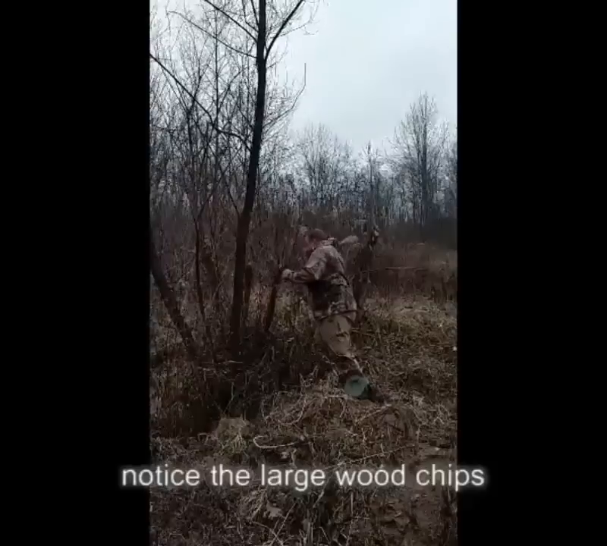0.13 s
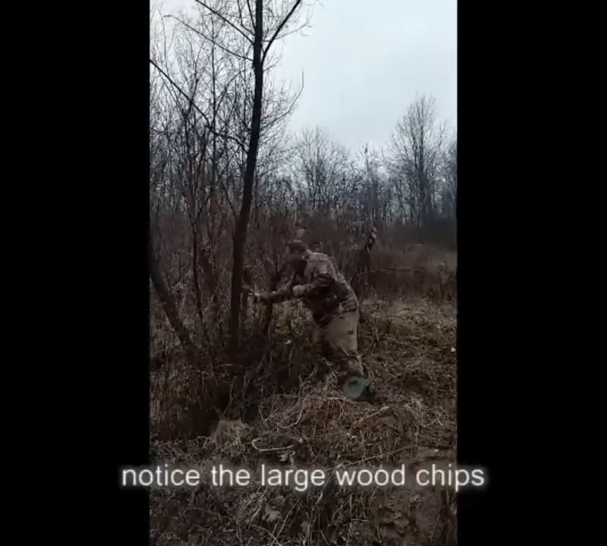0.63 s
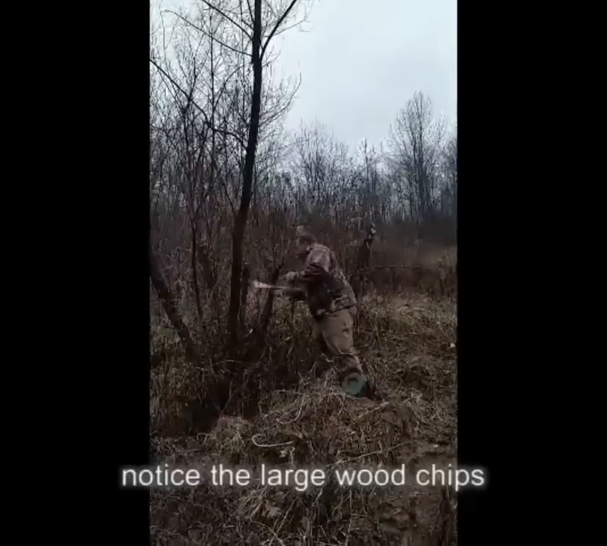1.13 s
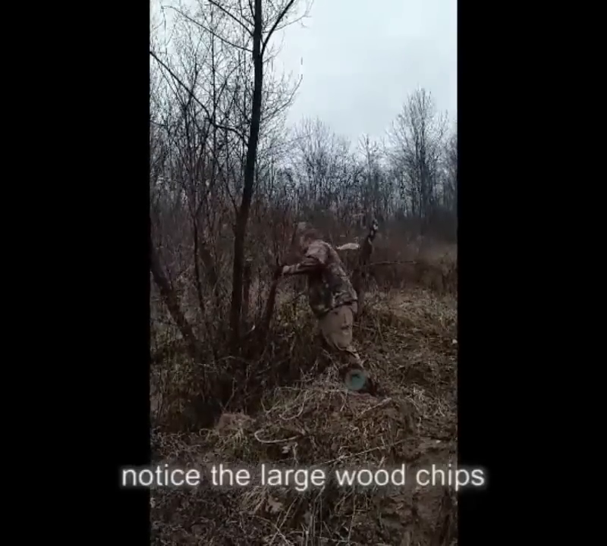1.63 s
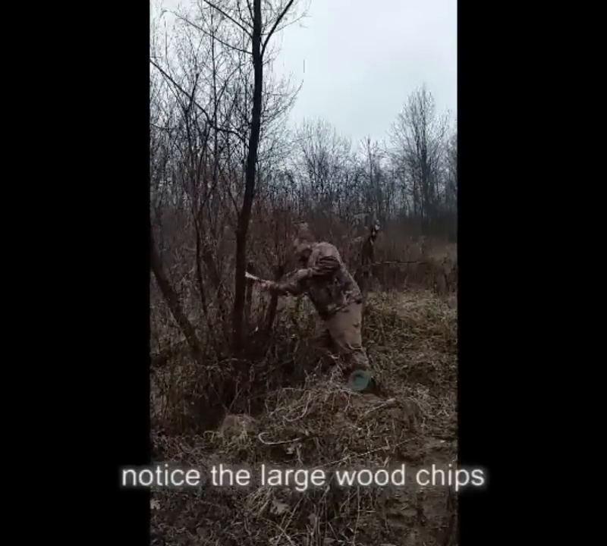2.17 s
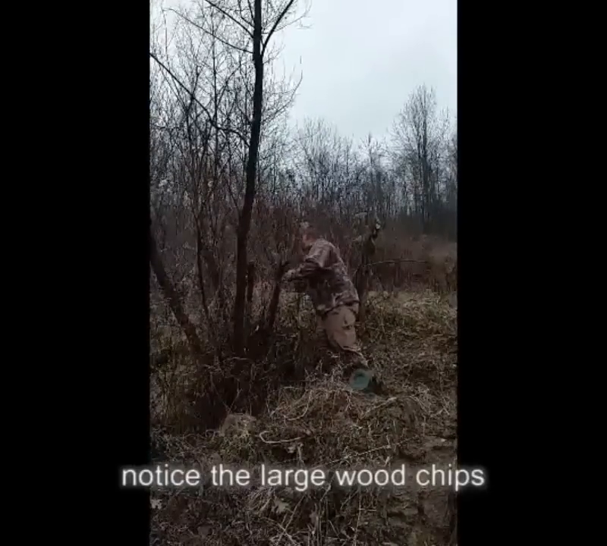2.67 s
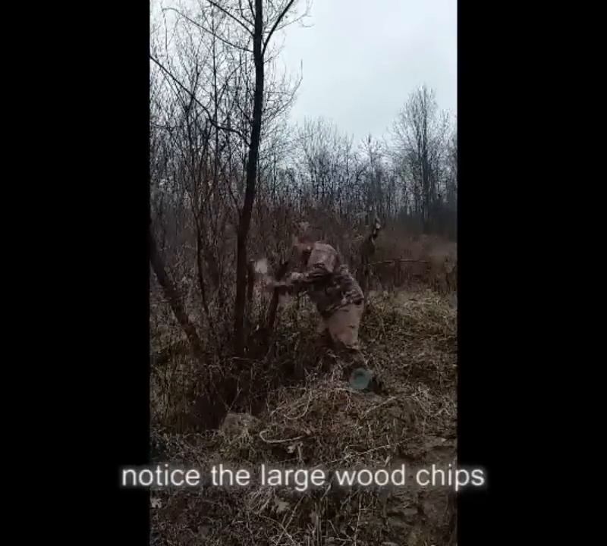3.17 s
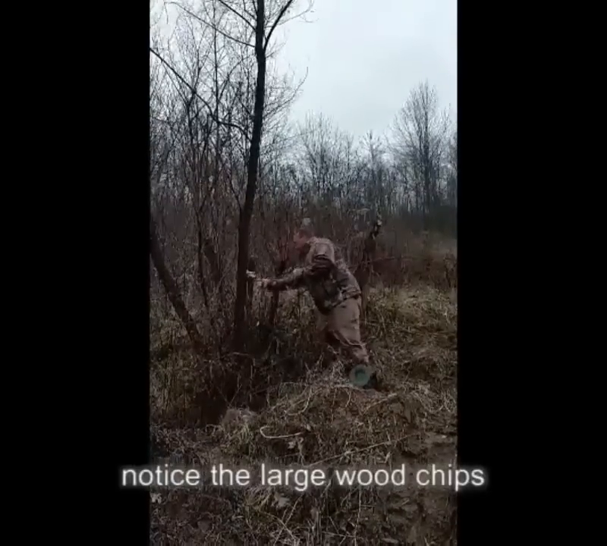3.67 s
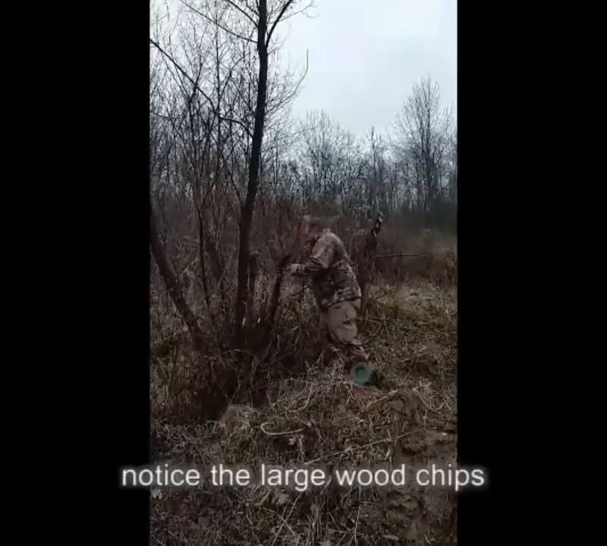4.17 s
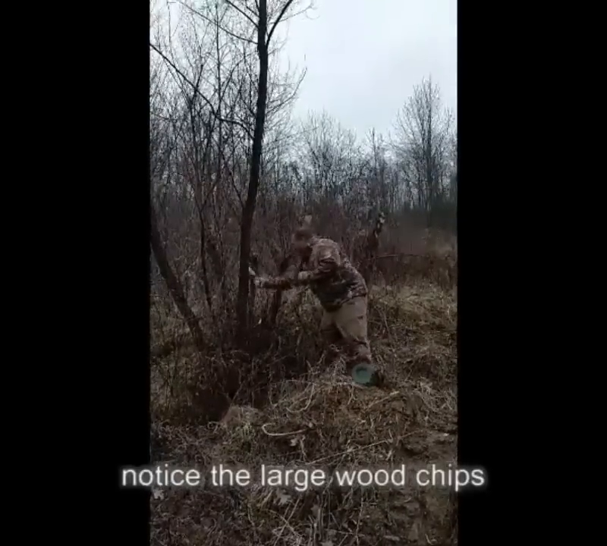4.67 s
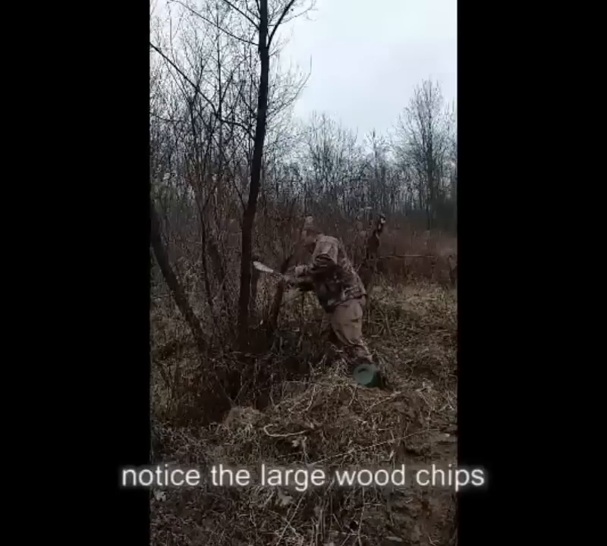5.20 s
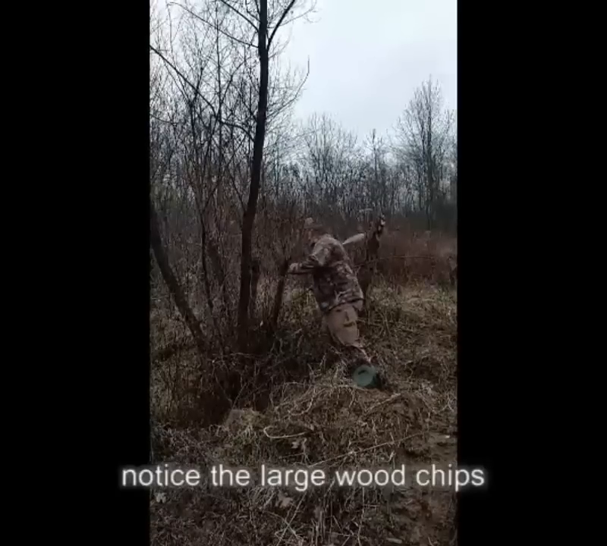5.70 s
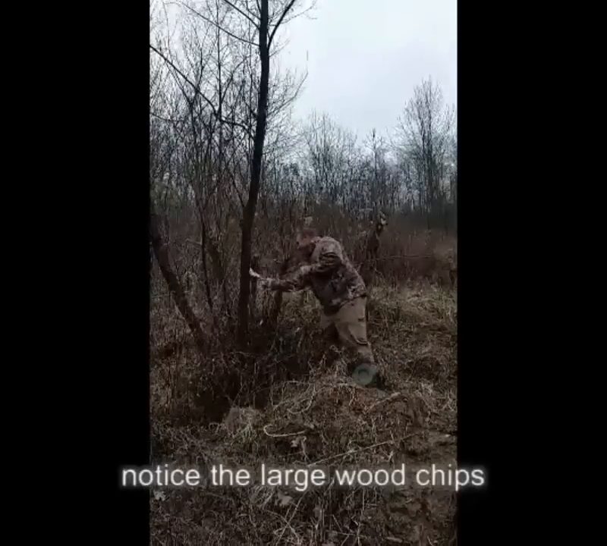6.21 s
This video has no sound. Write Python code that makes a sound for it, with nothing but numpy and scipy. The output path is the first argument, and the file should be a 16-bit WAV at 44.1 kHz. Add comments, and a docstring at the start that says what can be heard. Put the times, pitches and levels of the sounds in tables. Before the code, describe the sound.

Outdoors in scrubby woodland, a heavy blade hits a thin standing trunk five times, evenly spaced about 1.4 seconds apart. The first blow is thinner and brighter; the rest are hard, woody cracks with a tiny metallic chink and short scattered echo from the trees. Soft low wind puffs bump the microphone between blows, with small twig ticks. Single channel, microphone some metres away.

```python
"""Chopping in the woods

A heavy blade chops a thin trunk five times, some metres from the microphone in scrubby woodland.
Each blow is a shaped noise bite, a dull stop pulse and weakening after-knocks that excite damped trunk
modes; short blade tones chink within the bite, and decaying scattered noise is the answer of the trees.
Low pulses and filtered grains are wind puffs over a distant noise wash, a mid hush and a bright rustle.
Noise ticks of twigs and chips come now and then, and faint far hoots sag in pitch."""
import sys
import numpy as np
from scipy import signal
from scipy.fft import rfft, irfft
from scipy.io import wavfile
from scipy.ndimage import uniform_filter1d

SR = 44100
rng = np.random.default_rng(int(sys.argv[2]) if len(sys.argv) > 2 else 0)


def waveform_to_disk(signal):
    """Save audio, clipped to [-1, 1], as 16-bit WAV at the path in sys.argv[1]."""
    frames = np.transpose(np.atleast_2d(signal))
    scaled = np.clip(frames, -1, 1) * 32767
    samples = np.round(scaled).astype(np.int16)
    wavfile.write(sys.argv[1], SR, samples)


def elevation(decibels):
    """Turn decibel levels (scalar or array-like) into linear amplitude ratios."""
    levels = np.asarray(decibels, float)
    return 10 ** (levels / 20)


N = 279153
TIME = np.arange(N) / SR

# Spectrum of the distant wash. Each row: frequency in Hz, relative density in dB.
WASH_SPECTRUM = [(76, -30), (130, -8), (166, -2), (285, -8.5), (435, -12), (692, -15.5), (1240, -18),
                 (1550, -25.5), (2180, -22), (5500, -34), (6870, -35.5), (14800, -48), (16000, -53.5)]
# Level of the wash. Each row: time in seconds, level in dB.
WASH_LEVEL = [(0, -56), (.9, -60), (2.6, -58), (3.3, -58.5), (5.3, -60.5), (6.33, -60)]
# Spectrum of the mid hush. Each row: frequency in Hz, relative density in dB.
HUSH_SPECTRUM = [(300, -15), (900, 2), (1400, 8.5), (2200, -0.5), (5000, -32)]
# Level of the hush as it swells and fades. Each row: time in seconds, level in dB.
HUSH_LEVEL = [(0, -64.5), (.35, -61), (1.2, -68), (1.7, -78.5), (2.3, -77.5), (4, -72), (6.33, -70.5)]

# Spectrum of the rustling brush. Each row: frequency in Hz, relative density in dB.
BRUSH_SPECTRUM = [(800, -18.5), (2500, 4), (5000, -4), (7000, -1.5), (10000, -9.5), (15000, -18)]
# Swishes of the brush. Each row: centre in seconds, level in dB, spread in seconds.
SWISHES = [(.08, -76, 0.052), (1.41, -69, 0.014), (3.2, -68.5, 0.048), (4.51, -65, 0.033)]
RUSTLE_DB = -69  # the steady part

# Spectrum of the small eddies. Each row: frequency in Hz, relative gain in dB.
WIND_SPECTRUM = [(12, -32), (25, -1.5), (40, 3.5), (70, -0.5), (123, -3), (191, -12), (230, -20.5),
                 (400, -38.5), (520, -55), (880, -120)]
# Level of the small eddies. Each row: time in seconds, level in dB.
GUST_LEVEL = [(0, -64), (.4, -55), (.8, -65.5), (1.0, -59.5), (1.2, -44.5), (1.45, -57), (1.7, -50),
              (1.9, -47.5), (2.15, -36.5), (2.6, -45), (2.92, -44.5), (3.05, -54.5), (3.4, -36),
              (3.7, -52.5), (3.85, -31), (4.05, -47), (4.2, -46.5), (4.33, -51.5), (4.5, -52),
              (4.64, -29.5), (4.9, -50), (5.14, -43.5), (5.7, -49), (5.97, -43), (6.12, -53.5),
              (6.33, -40.5)]
# Strongest wind puffs. Each row: centre in seconds, level in dB, frequency in Hz.
PUFFS = [(1.178, -32, 72), (1.532, -34.5, 68), (1.987, -18.5, 104), (2.029, -30.5, 152), (2.167, -33, 110),
         (2.216, -18.5, 72.5), (2.232, -21, 140), (2.306, -42, 114), (2.448, -17.5, 125),
         (2.488, -31.5, 95), (2.59, -25.5, 95), (2.612, -29, 127), (2.892, -23, 69.5), (2.922, -29, 60),
         (2.946, -27, 99), (3.236, -27, 80), (3.398, -25, 89), (3.758, -36, 170), (3.811, -22.5, 92.4),
         (3.829, -21.5, 159), (3.853, -24.5, 155), (3.882, -16.5, 123), (4.054, -25.5, 88),
         (4.215, -37, 110), (4.404, -31, 92), (4.581, -21, 121), (4.634, -24.5, 124), (4.663, -20.5, 156),
         (4.791, -29.5, 216), (5.054, -32.5, 61), (5.11, -32, 54.4), (5.161, -33, 70), (5.472, -31, 116),
         (5.552, -16, 85.7), (5.562, -33.5, 200), (5.942, -33, 93), (5.984, -30.5, 108), (6.067, -34, 63)]
PUFF_CYCLES = 1.106

# Twigs and chips. Each row: start in seconds, level in dB, reference frequency in Hz,
# treble tilt above it in dB per octave, fall time by 60 dB in seconds.
TICKS = [(0.2188, -37, 1510, -1, 0.027), (0.266, -43, 1650, -5.5, 0.035), (.632, -38.5, 2820, 13, 0.011),
         (0.715, -51, 2520, 11, 0.026), (0.7418, -44, 1960, -2.5, 0.089), (0.958, -46.5, 3500, 0, 0.013),
         (1.303, -41, 4500, 0.5, 0.013), (2.046, -45, 3300, 0, 0.039), (2.356, -44, 5000, 0, 0.011),
         (2.499, -45, 480, -3, 0.065), (3.223, -40.5, 550, -4, 0.054), (3.384, -39, 3400, 7, .015),
         (4.678, -47.5, 1200, -2.5, 0.032), (5.6213, -45.5, 2600, -2, 0.014),
         (5.7335, -47.5, 1760, 1.5, 0.019)]

# Blows. Each row: start in seconds, bite length in ms, crackle in dB, tearing in dB,
# tilt in dB per octave.
BLOWS = [(0.6615, 1.43, -17.5, -21, 5), (2.0758, 2.58, -15, -17.5, -2), (3.4167, 4.1, -13.5, -13.5, -1),
         (4.8031, 3.4, -23.5, -19, 4), (6.191, 4.05, -17, -16.5, 0.5)]
# Pushes into the wood, a row a blow. Each row: entry in dB, stop delay in ms, stop in dB,
# stop pitch in Hz, rebound gap in ms, first rebound in dB.
PUSHES = [(-36, 0.94, -14.5, 1530, 5.3, -18), (-15, 2.82, -2.5, 1205, 9.6, -17),
          (-8, 2.3, -5.5, 850, 6, -18), (-14.5, 3.35, -4, 1260, 11, -21.5),
          (-9, 3.78, -2.5, 1060, 4, -15.5)]
ENTRY_AT, ENTRY_HZ = 0.25, 1470  # share of the bite length; pitch
REBOUND_HZ, REBOUND_FALL_DB = 910, -2.5  # pitch before scatter; change from one rebound to the next
THUD_DB, THUD_HZ = -21.5, 355  # a low thud goes with the stop, relative to its level
THUMP_DB, THUMP_HZ, THUMP_LAG_S = -51, 100.6, 0.01  # the root plate answers every blow
# Modes of the trunk. Each row: frequency in Hz, filter gain in dB, fall time by 60 dB in seconds.
TRUNK_MODES = [(211.7, -31.5, .08), (370.5, -30.5, 0.038), (582, -44.5, 0.054), (707, -35.5, 0.043),
               (824, -41.5, .045), (955, -42, 0.026), (1126, -52, 0.013), (1200, -47.5, 0.023),
               (1310, -38, 0.028), (1633, -43.5, 0.015), (1770, -42.5, 0.026)]
# Spectrum of the bite. Each row: frequency in Hz, relative density in dB.
BITE_SPECTRUM = [(1000, -16.5), (1800, -0.5), (2300, -7.5), (3200, 5.5), (4500, -1.5), (5800, -15.5),
                 (7000, -9.5), (10700, -28), (13900, -25), (15500, -48.5)]
SWELL_DB, SWELL_DB_PER_MS = -18.5, 6  # faint noise before the bite: level relative to it, and rise
# Spectrum of the tearing fibres. Each row: frequency in Hz, relative density in dB.
SPLINTER_SPECTRUM = [(180, -25), (300, -8), (1300, -10), (1840, -19), (2170, -13), (3070, -16),
                     (4720, -28.5), (7500, -21.5), (13800, -54), (15500, -74)]
# Decay of the tearing fibres. Each row: frequency in Hz, fall time by 60 dB in seconds.
SPLINTER_T60 = [(500, 0.1), (1500, 0.051), (4000, 0.047), (10000, 0.017)]
# Damped modes of the blade in the cut. Each row: frequency in Hz, relative level in dB, cycles.
BLADE_MODES = [(1630, 11.5, 1.2), (3300, -5, 5.4), (4353, -1.5, 4.5), (6660, 0.5, 8), (8400, -5, 5.5)]
# Chink of the edge, a row a blow. Each row: level in dB, pitch factor, brightest frequency in Hz,
# fall away from it in dB per squared octave.
CHINKS = [(-10.5, 1.11, 7900, 39.5), (-11.5, 0.956, 2750, 6.5), (-8, 1.02, 2030, 6), (-2, 1.047, 3040, 16),
          (-10.5, 1.028, 3600, 5.5)]
CHINK_AT, CHINK_SCATTER = 0.55, 0.3  # mean place and full range, as shares of the bite length

# Spectrum of the trees' answer. Each row: frequency in Hz, relative density in dB.
TREES_SPECTRUM = [(180, -31), (300, 2.5), (509, -14), (849, -6), (1050, -7), (1540, -7), (2210, -10.5),
                  (3870, -16), (6790, -18.5), (13600, -40), (15500, -51)]
# Answer of the trees, a row a blow. Each row: level in dB, tilt in dB per octave,
# centre of a lifted band in Hz, lift in dB.
ANSWERS = [(-48, 1.5, 7300, 8), (-40.5, 1, 1570, 4), (-40.5, 1, 2900, 3.5), (-41.5, 1.5, 3490, 5.5),
           (-40, 1, 1600, 2)]
# Echo bunches from near trunks. Each row: delay in seconds, relative level in dB, spread in seconds.
ECHOES = [(0.046, -3, 0.0072), (.072, -8.5, 0.01)]
TREBLE_HZ, TREBLE_LOSS_DB_PER_S = 5000, 44.5  # air and twigs swallow the treble of late echoes
WOODY_HZ, WOODY_DB = 1500, 3  # a band that the trunks throw back after every blow

# Faint far hoots. Each row: start in seconds, length in seconds, level in dB, initial pitch in Hz.
HOOTS = [(2.6, 0.26, -66, 540), (2.91, 0.27, -64, 495), (5.08, 0.11, -67.5, 529), (5.42, 0.19, -65.5, 508)]
HOOT_SAG_HZ_PER_S, HOOT_EDGE_S = 127, 0.027


def evened(x):
    """Normalisation divides by the root mean square, giving rms 1."""
    return x / np.sqrt(np.mean(x ** 2) + 1e-20)


def read(points, hz):
    """A spectrum is interpolated linearly along a logarithmic frequency axis."""
    f, value = np.transpose(points)
    return np.interp(np.log(hz + 1), np.log(f + 1), value)


def level_curve(rows):
    """A level linear in dB between points gives an exponential amplitude envelope."""
    seconds, db = np.transpose(rows)
    return elevation(np.interp(TIME, seconds, db))


def add(mix, s, sound):
    """Superposition: a sound starting at s seconds adds to the mix."""
    part = mix[round(s * SR):][:len(sound)]
    part += sound[:len(part)]


def add_wavelet(mix, s, db, hz, cycles, phase):
    """A cosine under a Gaussian envelope centred on s forms a pulse of a few cycles."""
    t = np.arange(-N // 100, N // 100) / SR
    bell = np.exp(-0.5 * (2.69 * hz * t / cycles) ** 2)
    add(mix, s + t[0], elevation(db) * bell * np.cos(2 * np.pi * hz * t + phase))


def coloured(x, points):
    """Zero-phase filtering multiplies the spectrum by a real gain."""
    hz = np.fft.rfftfreq(len(x), 1 / SR)
    return irfft(rfft(x) * elevation(read(points, hz)), len(x))


def noise(points, patchy_db, size=1024):
    """Random short-time spectra make coloured noise; smoothed level noise makes its patches drift."""
    hz = np.fft.rfftfreq(size, 1 / SR)
    real, imaginary, patches = rng.standard_normal((4 * N // size + 5, len(hz), 3)).T
    patches = uniform_filter1d(patches, size=10, axis=0)  # along frequency
    patches = evened(uniform_filter1d(patches, size=10, axis=1))  # along time
    gain = elevation(read(points, hz)[:, None] + patchy_db * patches)
    spectrum = (real + 1j * imaginary) * gain
    return evened(signal.istft(spectrum, nperseg=size, noverlap=3 * size // 4)[1][:N])


def dying(points, t60s, tilt_db, size):
    """Frequency-dependent damping: each band of a noise burst decays exponentially at its own rate."""
    hz, t, z = signal.stft(rng.standard_normal(size), SR, nperseg=64, noverlap=48)
    colour = elevation(read(points, hz) + tilt_db * np.log2(np.maximum(hz, 300) / 1500))
    fade = elevation(-60 * t / np.maximum(read(t60s, hz), 0.003)[:, None])
    return signal.istft(z * evened(colour)[:, None] * fade, SR, nperseg=64, noverlap=48)[1][:size]


def wash():
    """A distant wash is broadband noise, mostly low, under a slow level curve."""
    return level_curve(WASH_LEVEL) * noise(WASH_SPECTRUM, 1.2)


def hush():
    """A mid hush is band-shaped noise that swells and fades."""
    return level_curve(HUSH_LEVEL) * noise(HUSH_SPECTRUM, 1.5)


def rustle():
    """Fast random amplitude modulation roughens a bright hiss; Gaussian envelopes swell the swishes."""
    grains = elevation(1.2 * evened(uniform_filter1d(rng.standard_normal(N), size=150)))
    level = elevation(RUSTLE_DB)
    for s, db, spread in SWISHES:
        level = level + elevation(db) * np.exp(-0.5 * ((TIME - s) / spread) ** 2)
    return level * evened(noise(BRUSH_SPECTRUM, 0.86, size=256) * grains)


def wind():
    """Eddies at the microphone port are filtered random impulses; strong puffs are single low pulses."""
    strength = elevation(3.2 * np.minimum(rng.exponential(1, N), 4))
    happens = rng.random(N) < 300 / SR  # on average 300 a second
    eddies = rng.standard_normal(N) * strength * happens
    out = level_curve(GUST_LEVEL) * evened(coloured(eddies, WIND_SPECTRUM))
    for (s, db, hz), turn in zip(PUFFS, rng.random((len(PUFFS), 2))):
        add_wavelet(out, s, db, hz, PUFF_CYCLES, 2 * np.pi * turn[0])
        # a weak higher partial
        add_wavelet(out, s, db - 17, 1.7 * hz, 0.99 * PUFF_CYCLES, 2 * np.pi * turn[1])
    return out


def ticks():
    """Twigs and chips give damped noise bursts, weak in the bass, with a soft onset and tilted treble."""
    out = np.zeros(N)
    rise = 1 - np.exp(-TIME[:3000] / 0.0015)
    for s, db, hz, slope_db, t60 in TICKS:
        shape = [(hz / 4, -24), (hz, 0), (1.8 * hz, slope_db - 8.5),
                 (11000, slope_db * np.log2(11000 / hz) - 22),
                 (16000, slope_db * np.log2(16000 / hz) - 37)]
        add(out, s, elevation(db) * rise * dying(shape, [(100, t60), (20000, t60)], 0, size=3000))
    return out


def bites():
    """Fracture noise: a faint swell for a few ms, an arched crackling bite, then tearing fibres."""
    out, lead = np.zeros(N), 200  # samples of faint noise before the bite
    for s, bite_ms, db, tear_db, tilt_db in BLOWS:
        bite = dying(BITE_SPECTRUM, [(100, 1), (20000, 1)], tilt_db, size=800)
        u = (np.arange(800) - lead) / SR / (bite_ms / 1000)  # 0 to 1 through the bite
        arch = np.sin(np.pi * np.clip(u, 0, 1))
        swell = elevation(SWELL_DB + SWELL_DB_PER_MS * bite_ms * np.minimum(u, 0)) * (u < 0.5)
        add(out, s - lead / SR, elevation(db) * bite * (arch + swell))
        tearing = dying(SPLINTER_SPECTRUM, SPLINTER_T60, tilt_db, size=5000)
        add(out, s + bite_ms / 1000, elevation(tear_db) * tearing)
    return out


def trunk():
    """Modal excitation: short pushes with a strong negative peak sound directly and ring damped modes."""
    pushes, t = np.zeros(N), TIME[:6000]
    wobble = rng.uniform(-0.78, 1, (len(BLOWS), 3))  # one value a rebound
    for (s, bite_ms, *_), push, w in zip(BLOWS, PUSHES, wobble):
        entry_db, stop_ms, stop_db, stop_hz, gap_ms, back_db = push
        stop = s + stop_ms / 1000
        knocks = [(s + ENTRY_AT * bite_ms / 1000, entry_db, ENTRY_HZ),
                  (stop, stop_db, stop_hz),
                  (stop, stop_db + THUD_DB, THUD_HZ),
                  (stop + THUMP_LAG_S, THUMP_DB, THUMP_HZ)]
        for k in range(len(w)):
            at = stop + (k + 1 + 0.13 * w[k]) * gap_ms / 1000
            knocks.append((at, back_db + k * REBOUND_FALL_DB, REBOUND_HZ * (1 + 0.12 * w[-k])))
        for at, db, hz in knocks:
            add_wavelet(pushes, at, db, hz, 1.28, np.pi)  # phase pi: a negative peak
    ring = sum(elevation(db - 60 * t / t60) * np.sin(2 * np.pi * hz * t) for hz, db, t60 in TRUNK_MODES)
    return pushes + signal.oaconvolve(pushes, ring)[:N]


def chinks():
    """Blade resonances: every mode sounds a few cycles at a random place within each bite."""
    out, chance = np.zeros(N), rng.random((len(BLOWS), len(BLADE_MODES), 2))
    for (s, bite_ms, *_), (db, factor, top_hz, fall_db), rows in zip(BLOWS, CHINKS, chance):
        for (hz, mode_db, cycles), (when, turn) in zip(BLADE_MODES, rows):
            at = s + (CHINK_AT + CHINK_SCATTER * (when - 0.5)) * bite_ms / 1000
            level_db = db + mode_db - fall_db * np.log2(factor * hz / top_hz) ** 2
            add_wavelet(out, at, level_db, factor * hz, cycles, 2 * np.pi * turn)
    return out


def woods(tilt_db, band_hz, lift_db, size=40000):
    """Multiple scattering: noise builds up and thins out, with duller bunches from the nearest trunks."""
    t, hz = TIME[:size], np.geomspace(150, 16000, num=60)
    colour = read(TREES_SPECTRUM, hz) + tilt_db * np.log2(hz / 1500)
    colour += lift_db * np.exp(-(np.log2(hz / band_hz) / 0.15) ** 2)
    colour += WOODY_DB * np.exp(-(np.log2(hz / WOODY_HZ) / 0.2) ** 2)
    scatter = noise(np.transpose([hz, colour]), 1.6, size=256)[:size]
    treble = coloured(scatter, [(0.8 * TREBLE_HZ, -40), (1.2 * TREBLE_HZ, 0)])
    scatter = scatter - treble * (1 - elevation(-TREBLE_LOSS_DB_PER_S * t))
    dull = [(300, -4), (900, -2.5), (1500, -3.5), (2400, -8.5), (12000, -14.5)]  # (Hz, dB)
    bunches = evened(coloured(scatter, dull))
    build_up = 1 - np.exp(-(t / 0.025) ** 2)
    decay = (0.024 / (t + 0.013)) ** 0.72 * elevation(-6 * t)  # a power law and 6 dB a second besides
    echoes = sum(elevation(db) * np.exp(-0.5 * ((t - s) / spread) ** 2) for s, db, spread in ECHOES)
    return build_up * decay * scatter + bunches * echoes


def chopping():
    """Direct sound plus reverberation: the dry blows and a newly scattered answer to each."""
    out = bites() + trunk() + chinks()
    for (s, *_), (db, *colour) in zip(BLOWS, ANSWERS):
        add(out, s, elevation(db) * woods(*colour))
    return out


def hoots():
    """A sine of falling frequency, modulated by slow complex noise, is a fuzzy tone with soft ends."""
    out, t = np.zeros(N), TIME[:SR]
    for s, length, db, hz in HOOTS:
        slow = uniform_filter1d(rng.standard_normal((SR, 2)), size=550, axis=0)
        real, imaginary = uniform_filter1d(slow, size=550, axis=0).T
        shake = 0.58 + evened(real) + 1j * evened(imaginary)
        cycles = hz * t - 0.5 * HOOT_SAG_HZ_PER_S * t ** 2
        tone = evened((shake * np.exp(2j * np.pi * cycles)).real)
        ends = np.clip(np.minimum(t, length - t) / HOOT_EDGE_S, 0, 1)
        add(out, s, elevation(db) * tone * ends)
    return out


def scene():
    """Linear superposition of all sources in one channel."""
    return (wash() + hush() + rustle() + wind() + ticks() + chopping() + hoots())[None]


def roll_off(x):
    """The treble ends steeply here."""
    return signal.sosfilt(signal.butter(12, 16160, fs=SR, output="sos"), x)


def record(dry):
    """Saturation rounds off peaks near full scale; a linear-phase low-pass then limits the band."""
    rounded = dry / (1 + np.abs(dry) ** 6) ** (1 / 6)
    low_pass = signal.firwin(255, 15900, fs=SR)[None]
    limited = signal.oaconvolve(rounded, low_pass, "same")
    return roll_off(limited)


dry = scene()
out = record(dry)
waveform_to_disk(out)
```